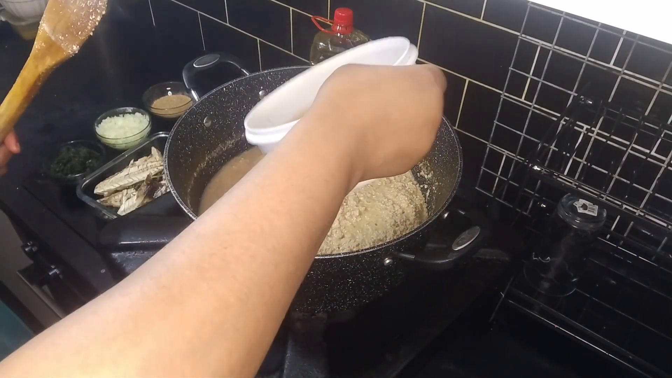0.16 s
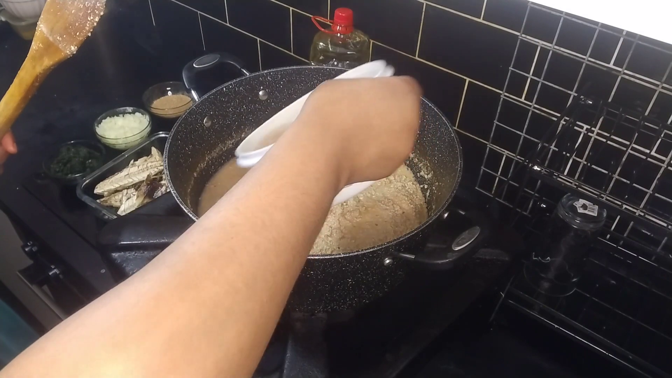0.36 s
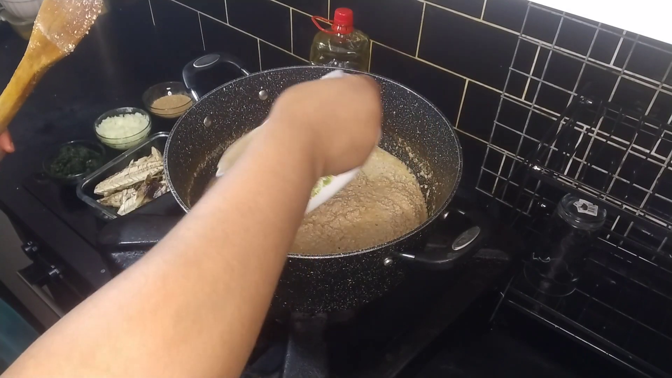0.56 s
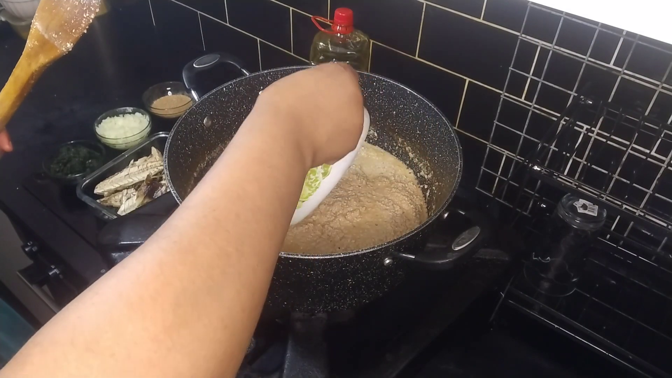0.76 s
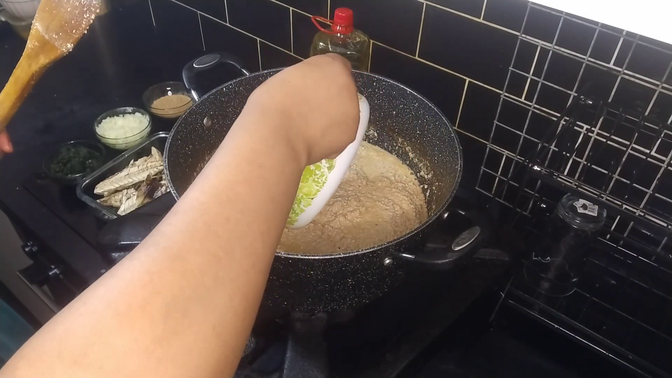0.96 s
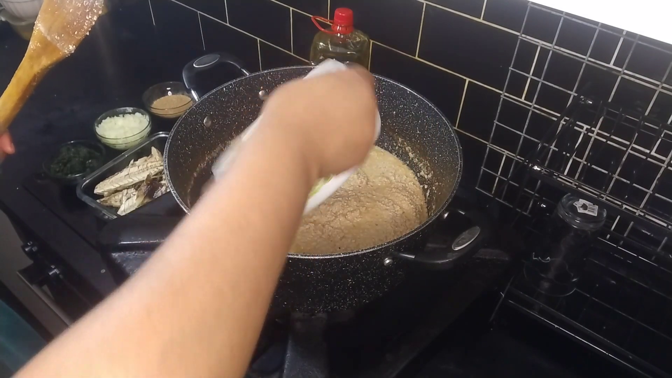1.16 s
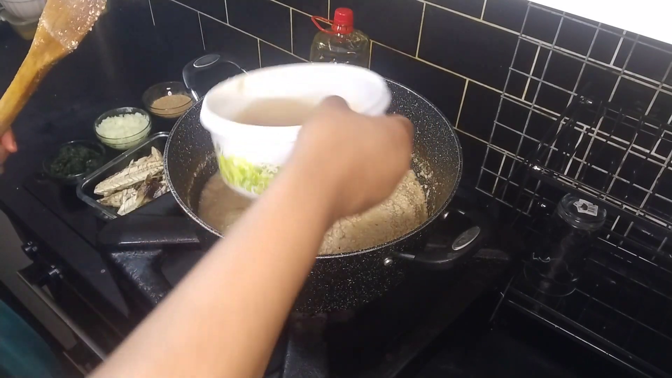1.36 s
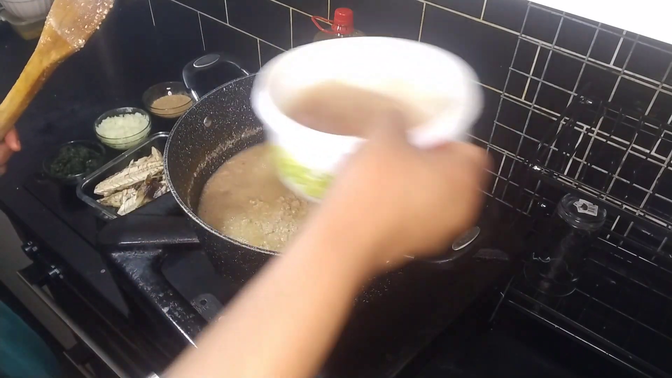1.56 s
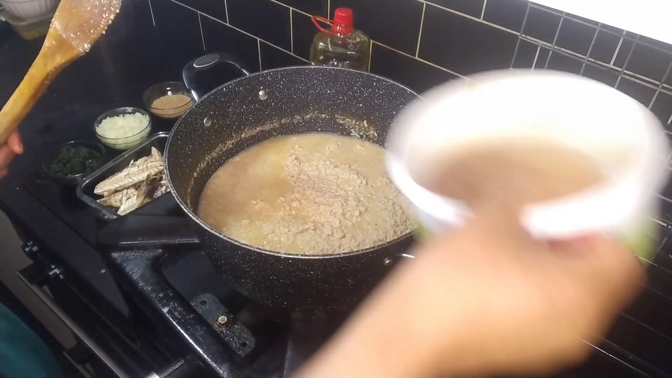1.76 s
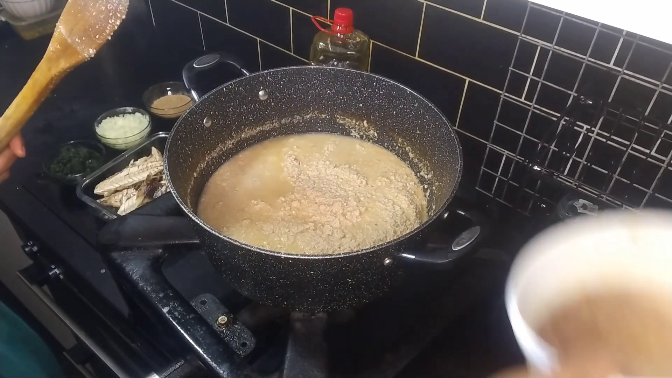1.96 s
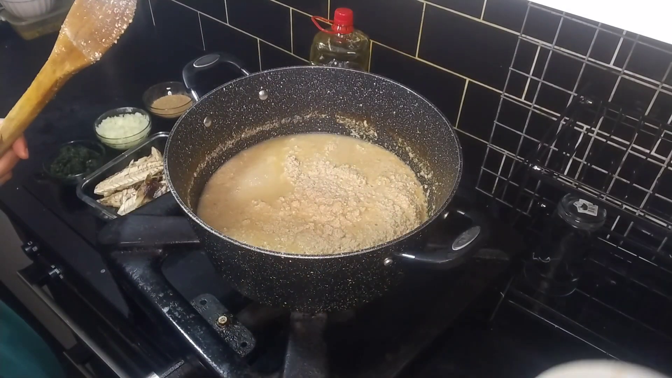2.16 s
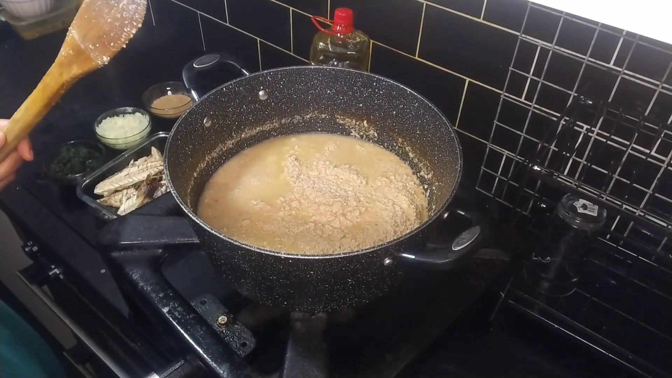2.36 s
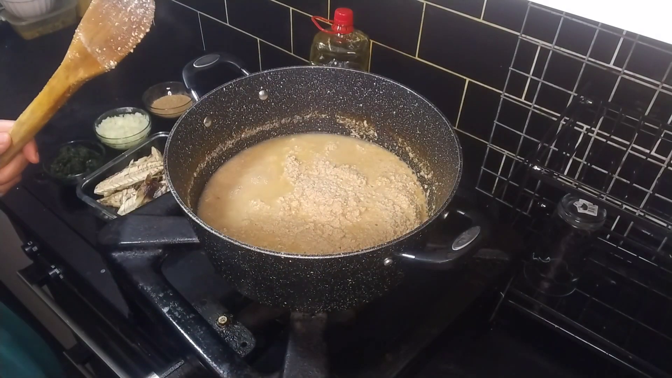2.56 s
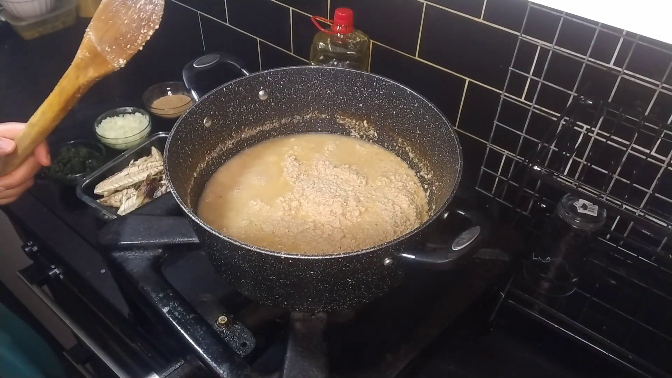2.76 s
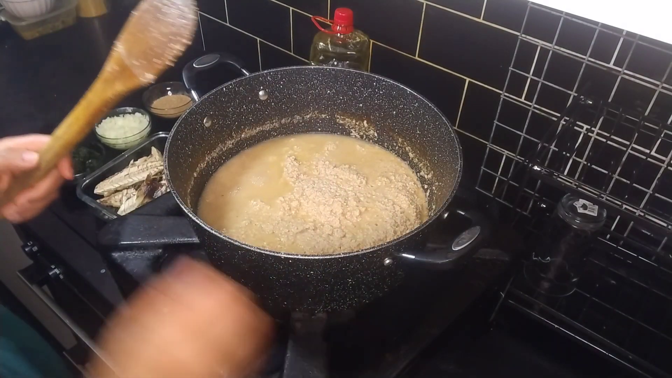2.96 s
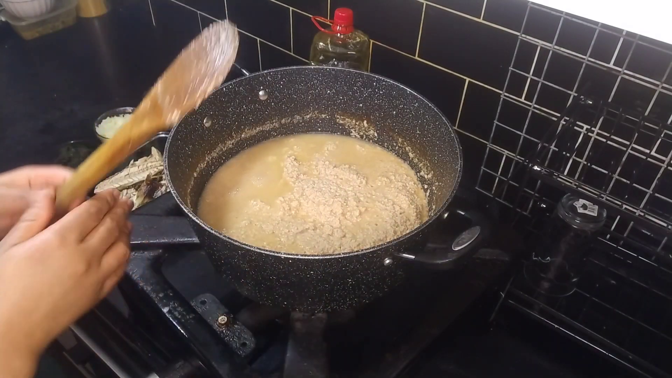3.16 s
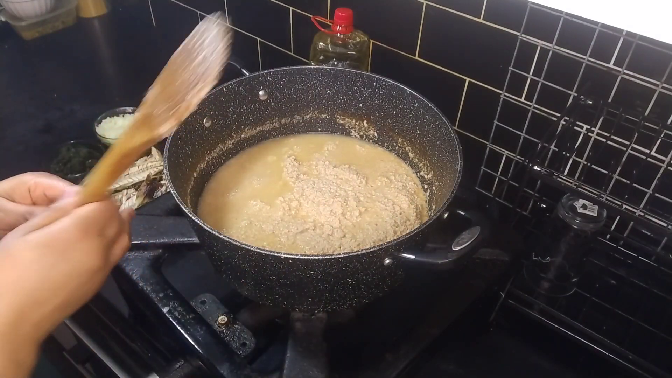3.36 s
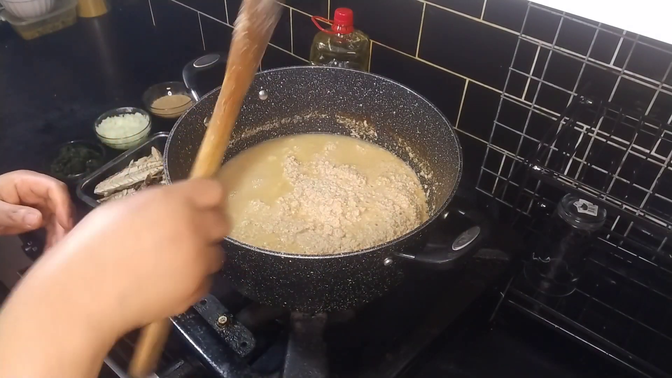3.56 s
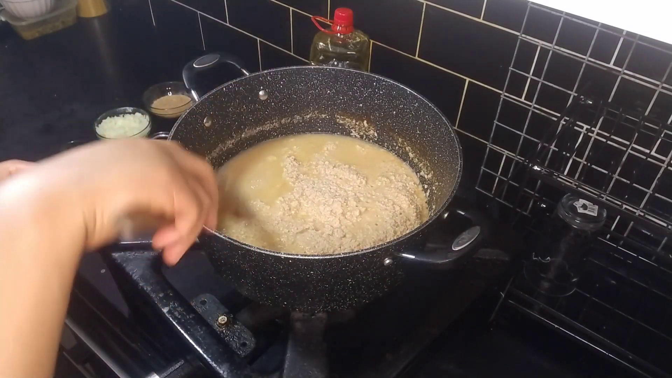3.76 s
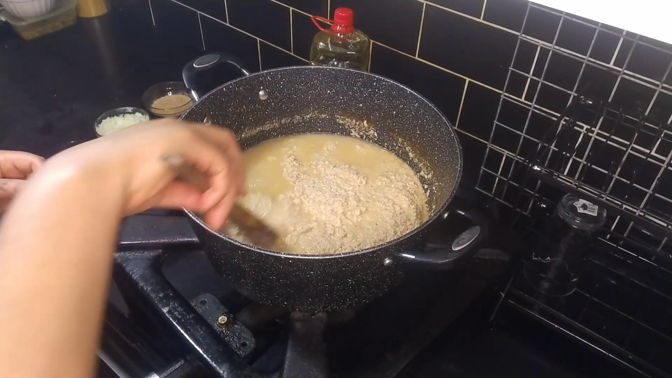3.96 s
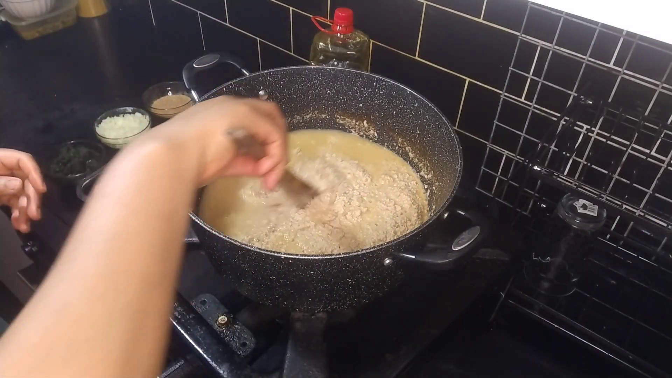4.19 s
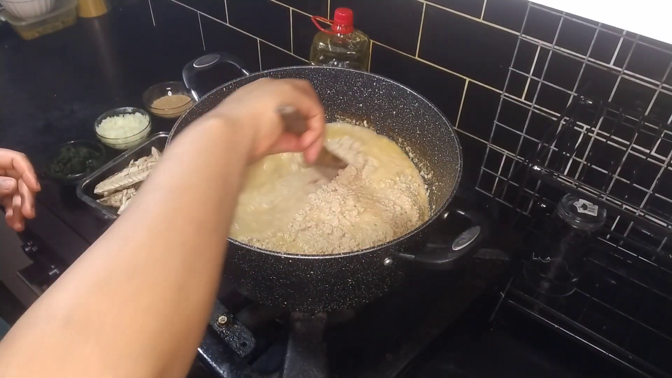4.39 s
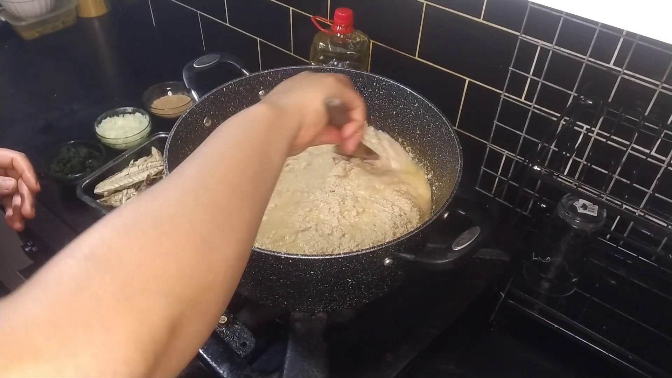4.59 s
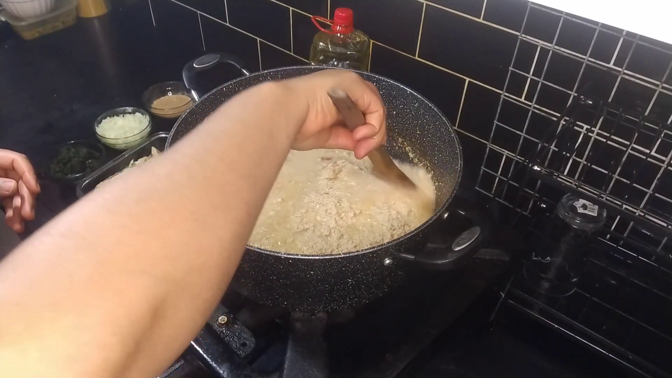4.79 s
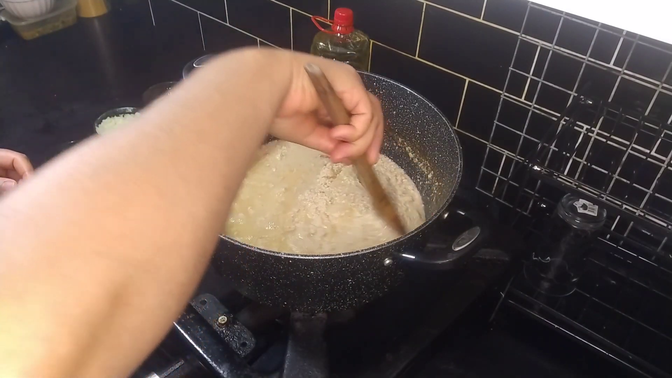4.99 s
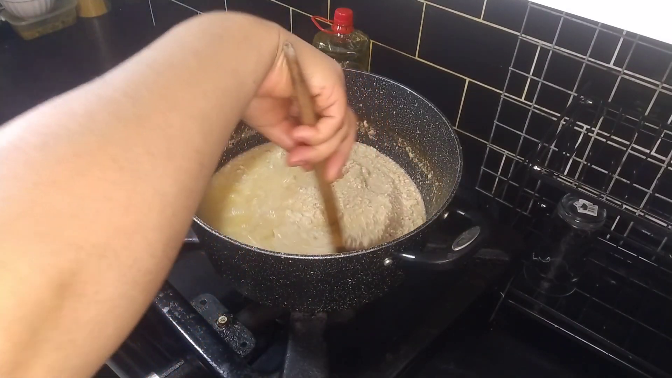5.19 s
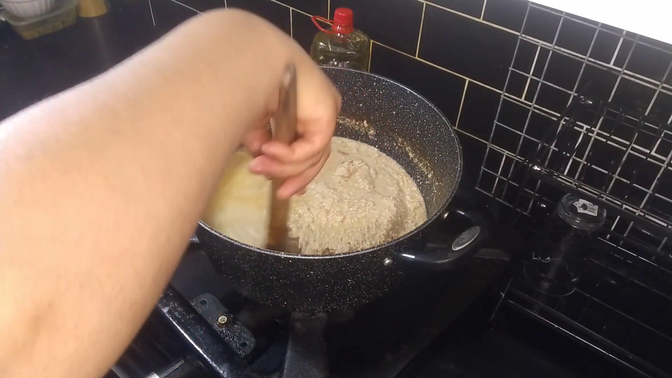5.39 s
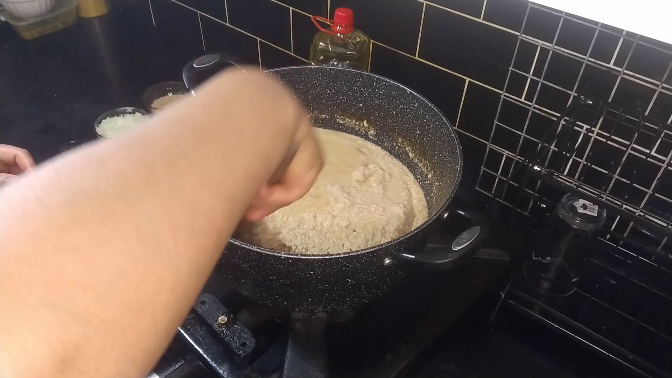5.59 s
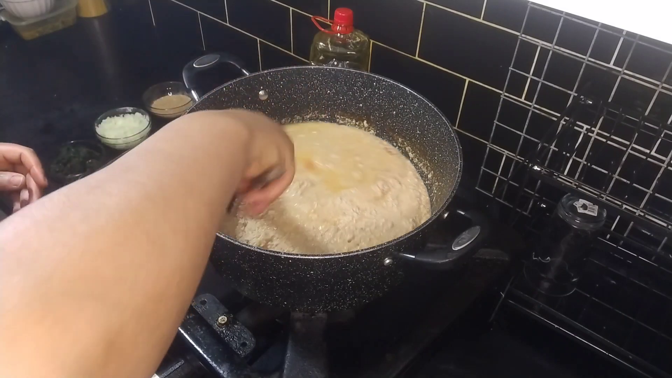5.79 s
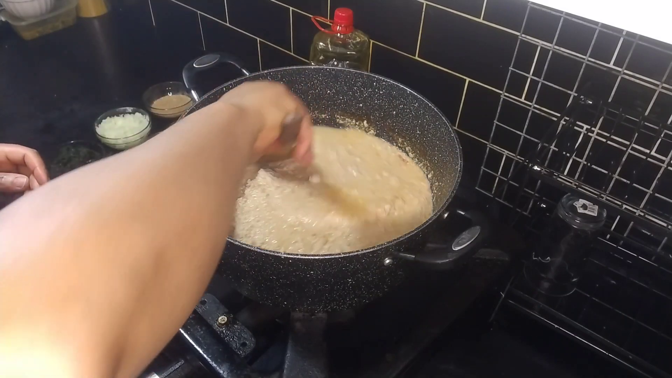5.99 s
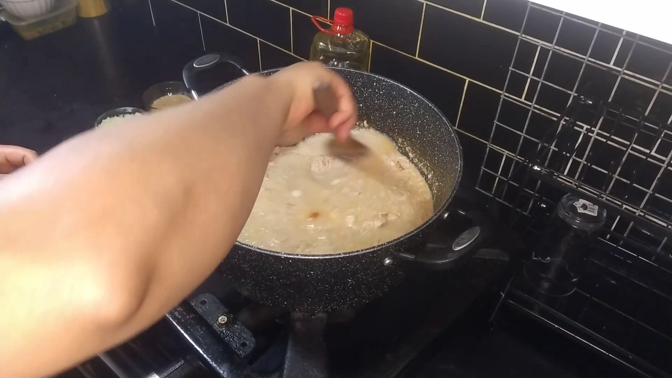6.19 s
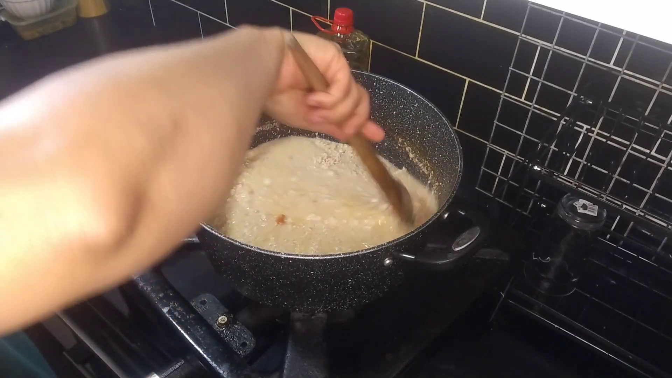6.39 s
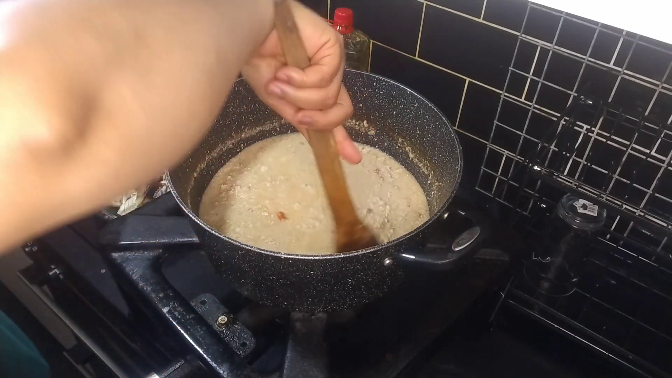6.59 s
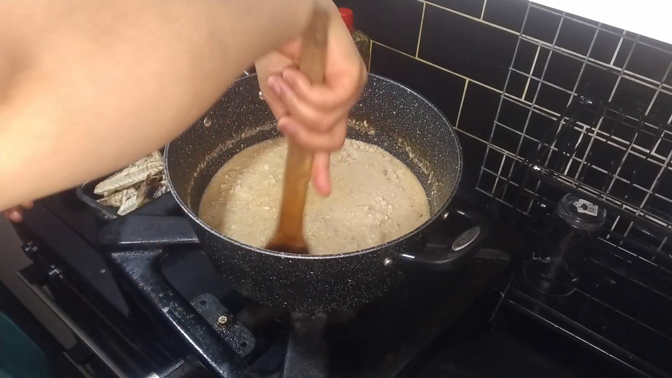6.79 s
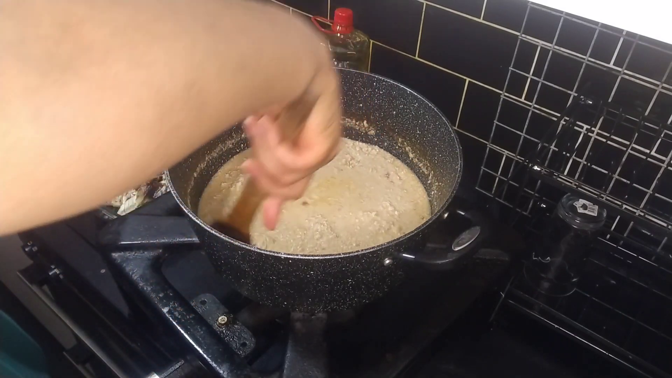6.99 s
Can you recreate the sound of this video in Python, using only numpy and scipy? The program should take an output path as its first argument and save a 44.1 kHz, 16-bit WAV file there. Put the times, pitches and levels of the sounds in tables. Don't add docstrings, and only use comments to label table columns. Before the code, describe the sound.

Bright steady sizzle from a pot of thick soup, liquid glugging in, a plastic tub clattering onto the counter, then wooden-spoon stirring with a steam hiss.

```python
import sys
import numpy as np
from scipy import signal
from scipy.fft import rfft, irfft, next_fast_len
from scipy.io import wavfile

SR = 44100
rng = np.random.default_rng(int(sys.argv[2]) if len(sys.argv) > 2 else 0)


def volts_from_decibels(level):
    exponent = np.asarray(level, float) / 20
    return 10 ** exponent


def transcribe(signal):
    frames = np.atleast_2d(signal).T
    limited = np.clip(frames, -1, 1)
    pcm = np.round(limited * 32767).astype(np.int16)
    wavfile.write(sys.argv[1], SR, pcm)


N = 310391

# pitch_hz, likeness (0 to 1)
PORT_LIKENESS = [(30, .72), (60, .8), (130, .92), (290, .96), (420, .85), (600, .5), (1000, .3),
                 (2000, .12), (4000, .04), (15000, .02)]
# pitch_hz, level_db
PORT_BALANCE = [(25, .4), (80, -1.3), (250, .7), (1000, .3), (2000, -.6), (4000, .7), (9000, .3),
                (13000, -3.5)]
LEFT_LAG = 5
MIC_HISS_DB, MIC_HISS_HZ = -60.5, 3000
PORT_HZ, PORT_WIDTH_HZ, PORT_GAIN = 13100, 660, 1.8
TOP_CUT_HZ = 15740
WALL_TRIPS = [.0083, .0091, .0107, .0119, .0131, .0143, .0157, .0173, .0187, .0199, .0217, .0233, .0251,
              .0269, .0283, .0307]
KITCHEN_T60_S, WALL_CUT_HZ = 0.41, 4200
# pitch_hz, level_db (per Hz)
ROOM_COLOUR = [(14, 12.5), (24, -4.5), (32, -2), (42, -13), (55, -6.5), (75, -12.5), (120, -13), (150, -13),
               (220, -25.5), (294, -20.5), (418, -20.5), (800, -22.5), (1100, -17.5), (1500, -35)]
ROOM_DB = -50
# pitch_hz, level_db
FRIDGE_HUM = [(100.6, -53.5), (50, -62.5), (147.5, -62.5)]

# start_s, crack_db, thud_db
TUB_TOUCHES = [
    (2.5358, -12, -20),
    (2.548, -21, -34),
    (2.556, -27, -52),
    (2.566, -28, -43),
    (2.578, -22, -27),
    (2.586, -26, -40),
    (2.601, -29, -29.5),
    (2.701, -31.5, -36),
    (2.749, -36, -47),
    (2.8, -50, -43),
]
# pitch_hz, level_db, t60_s (shortened to 0.15 of this when it rings)
TUB_SHELL = [(666, -6, 0.4), (800, -5, 0.37), (1265, 2, 0.54), (1480, -13, 0.35), (1620, -1, 0.43),
             (1870, -8, 0.8), (2400, -1, 0.32), (2640, -28, 0.27), (3100, -1, 0.12), (3585, -14, 0.25),
             (4240, -15, 0.19), (5200, -22, 0.2), (2130, -13, 0.18), (1060, -15, 0.22)]
# pitch_hz, level_db, t60_s
COUNTER_MODES = [(42, -7, 0.18), (57.3, -2.5, 0.26), (84.8, 5.5, 0.09), (109, 13.5, 0.053),
                 (140, -17, 0.12), (258.5, -17, 0.14), (423, -10.5, 0.048), (560, -30, 0.07),
                 (684, -13, 0.17)]
SOFT_TOUCH_DULLS = 0.74

# pitch_hz, width_hz, level_db
POT_LOW_MODES = [(418.6, 32, 6.5), (486, 30, 2), (547, 36, 1.5), (630.4, 11.6, -0.5), (711, 17, -5.5)]
# pitch_hz, width_hz, level_db
POT_HIGH_MODES = [(786, 32, -2), (935, 28, 3.5), (1106, 47, 4), (1289, 23, 0), (1381, 17, 2.5),
                  (1482, 24, -1.5), (1600, 15, -1.5), (1659, 15, 3.5), (1832, 29, 4), (2070, 13, -20),
                  (2300, 72, -0.5), (2698, 34, 4), (3057, 58, 1.5)]
# pitch_hz, width_hz, level_db
SOUP_MODES = [(147, 40, -3), (193, 12, -11), (258, 24, 1.5), (306.2, 24, 1.5)]
# start_s, effort_db
STIRRING = [(0, -3.5), (.55, -2.5), (.8, 2), (1.2, 0), (1.6, 0), (2.1, -2), (3.4, -0.5), (4.2, 5),
            (4.9, 2.5), (5.2, -5.5), (5.45, 6.5), (6.05, 1.5), (6.5, 2), (6.8, 2.5), (7.04, 11.5)]
SOUP_DB, RUMBLE_DB, SCRAPE_DB = -60, -57, -51
SOUP_FOLLOWS, RUMBLE_FOLLOWS, SCRAPE_FOLLOWS_HEAT = 0.82, 0.26, 0.73

# start_s, level_db, pitch_hz, t60_s
SPIT_EVENTS = [(.34, -39, 2120, 0.13), (.754, -35, 6500, .05), (1.041, -29, 6400, 0.18),
               (1.156, -37, 3500, 0.065), (1.277, -36, 2720, 0.058), (1.351, -33, 6600, 0.19),
               (1.501, -31, 5500, 0.04), (3.6, -36, 13000, .05), (3.81, -32, 4150, 0.025),
               (3.808, -33, 13000, .05), (6.087, -38, 14800, .04), (6.407, -43, 9000, .037),
               (6.517, -37.5, 3140, 0.084)]
SPIT_WIDTH, SPIT_RING_DB = 0.16, -25
# start_s, level_db, pitch_hz, t60_s
SPLASH_EVENTS = [(.766, -42, 2700, 0.21), (.806, -35, 2900, 0.17), (0.817, -38.5, 1700, .08),
                 (0.749, -36, 5000, .015), (6.225, -47, 1240, 0.1), (6.095, -41, 3000, .02),
                 (.95, -43, 1000, 0.09), (1.037, -45, 900, 0.15), (1.074, -40, 1290, 0.12),
                 (1.171, -39.5, 2800, 0.13), (2.885, -36, 2470, 0.026), (2.896, -31.5, 2450, 0.02),
                 (3.542, -31, 2450, 0.017), (3.602, -29.5, 6000, 0.019), (3.869, -36, 3000, 0.034),
                 (5.289, -42, 3650, 0.11), (5.43, -37, 3940, 0.089), (6.303, -34.5, 4440, 0.065),
                 (6.417, -34, 5260, 0.092), (6.58, -43, 5000, 0.043), (6.601, -47, 795, 0.087),
                 (6.742, -53, 810, 0.04), (6.801, -45.5, 800, 0.15), (6.91, -47.5, 900, .15)]
SPLASH_WIDTH, SPLASH_RING_DB = 0.67, -17
# start_s, level_db
SPOON_TAPS = [
    (4.053, -46),
    (5.632, -37),
    (5.928, -43),
    (6.304, -49),
    (6.414, -37.5),
    (6.505, -59),
]
TAP_HZ, TAP_WIDTH_HZ, TAP_T60_S, TAP_RING_DB = 1500, 860, 0.13, -13.5

# start_s, level_db, pitch_hz, t60_s
BUBBLE_EVENTS = [(.343, -48, 2250, .06), (.769, -30.5, 2980, 0.025), (.778, -36, 2300, 0.04),
                 (.775, -44, 980, .04), (.824, -29.5, 430, 0.065), (.838, -33, 455, .05),
                 (0.878, -36, 510, .045), (1.04, -45, 659, 0.28), (1.04, -40, 974, 0.056),
                 (1.074, -23.5, 542, 0.041), (1.094, -36, 530, 0.037), (1.177, -34.5, 2590, 0.076),
                 (.9, -44, 540, .04), (1.062, -40, 1800, .08), (1.19, -43, 685, 0.086),
                 (1.335, -36, 660, 0.046), (1.347, -40, 770, 0.096), (1.36, -42, 2260, 0.09),
                 (3.265, -25.5, 250, 0.027), (3.588, -28, 284, 0.034), (4.635, -40, 423, .047),
                 (4.71, -38, 415, 0.087), (4.821, -40, 425, 0.12), (4.951, -34, 2686, 0.051)]
# start_s, level_db, pitch_hz
PLOP_EVENTS = [(5.459, -34, 240), (5.508, -30, 169), (5.555, -44, 300), (5.629, -35, 464),
               (6.096, -42, 425), (6.3, -41, 435), (6.555, -47, 428), (6.778, -41, 440), (5.645, -39, 740),
               (5.709, -42, 281), (5.769, -40, 548), (5.832, -34, 430), (6.48, -43, 570), (6.546, -41, 950),
               (6.605, -42, 640), (6.618, -46, 700), (6.639, -43, 410), (6.66, -52, 418), (6.686, -37, 412),
               (6.739, -39, 915), (6.761, -40, 430), (6.92, -43, 775), (7.02, -41, 520), (7.027, -38, 990)]
PLOP_T60_S, BUBBLE_RISE = 0.056, 0.073
# start_s, level_db, pitch_hz, t60_s
WALL_PINGS = [(5.632, -35.5, 1950, 0.11), (5.632, -38, 1306, 0.11), (6.098, -40, 2040, 0.099),
              (6.13, -48, 560, 0.25), (6.304, -45, 1830, 0.1), (6.412, -33.5, 1113, 0.091),
              (6.416, -36.5, 2030, .06), (6.425, -37.5, 429, .1), (6.5065, -29, 1080, 0.034),
              (6.521, -44, 1010, .05), (6.79, -48, 2140, 0.088), (6.51, -47, 1840, 0.1),
              (6.783, -42, 1110, 0.045), (6.897, -42, 1105, 0.05)]
PING_RISE = 0.035
# start_s, level_db, pitch_hz
SOFT_THUMPS = [
    (.41, -54, 42),
    (2.685, -32, 140),
    (2.719, -24.5, 61.4),
    (2.745, -39, 115),
    (2.789, -43, 70.4),
    (3.969, -34.5, 50),
    (4.031, -37, 44.7),
    (4.6, -61, 48),
    (6.82, -37, 179),
]
THUMP_CYCLES = 11.3

# pitch_hz, level_db (per Hz)
HISS_COLOUR = [(3500, -7.5), (5800, -4.5), (6300, 0), (7500, 2.5), (8900, 8), (10200, 9.5), (11500, 5),
               (13200, -1.5), (17000, -8)]
# pitch_hz, level_db (per Hz)
COARSE_COLOUR = [(600, -31), (1000, -12.5), (1460, -9), (2050, -4), (3500, -6), (6500, -4.5), (8500, -4),
                 (11000, -24)]
# pitch_hz, level_db (per Hz)
FLASH_COLOUR = [(3500, -14), (6000, -12.5), (7500, -8), (9000, -2.5), (10500, 0.5), (11500, -4),
                (12700, -10), (15000, -13), (17000, -18)]
# start_s, sizzle_db
FLOOR_HEAT = [(0.0, -39), (1.28, -39.5), (1.63, -41.5), (2.58, -41), (2.91, -42), (3.98, -43.5),
              (4.35, -45), (5.1, -46.5), (6.15, -50.5), (6.36, -53), (7.04, -51)]
FIZZ_DB, FIZZ_FOLLOWS = -50.5, 0.37
FLASH_START_S, FLASH_FULL_S, FLASH_END_S = 5.148, 5.35, 5.73
FLASH_DB, FLASH_SETS_IN_DB, FLASH_FALL_DB_PER_S = -40.5, -4, 38
FLASH_FIZZ_DB, FLASH_SCRAPE_DB, CHURN_DB, CHURN_LATE_S = -9, -4, -54.5, 0.1
# start_s, rise_db
FLASH_SPURTS = [
    (5.3, 4.5),
    (5.44, 1.5),
    (5.63, 0.5),
    (5.68, 2),
    (5.745, 2),
]
SPURT_S, SPURT_FIZZ = 0.019, 2.2


def rms_one(x):
    return x / np.sqrt(np.mean(x ** 2) + 1e-20)


def in_time(rows):
    s, *columns = np.transpose(rows)
    return [np.interp(np.arange(N) / SR, s, c) for c in columns]


def at_hz(points, hz):
    points = np.array(points)
    return np.interp(np.log(hz), np.log(points[:, 0]), points[:, 1])


def shaped(x, gain_db):
    size = next_fast_len(N)
    hz = np.arange(1, size // 2 + 2) * SR / size
    return irfft(rfft(x, size) * volts_from_decibels(gain_db(hz)), size)[:, :N]


def drift(rate):
    r = np.exp(-80 * np.pi * rate / SR)
    noise = rng.standard_normal(N // 40 + 2002)
    slow = signal.lfilter([1], [1, -2 * r, r * r], noise)[2000:]
    return np.interp(np.arange(N) / 40, np.arange(len(slow)), rms_one(slow))


def resonance(x, hz, width_hz):
    r = np.exp(-np.pi * width_hz / SR)
    feedback = [1, -2 * r * np.cos(2 * np.pi * hz / SR), r * r]
    return signal.lfilter(np.array([1, 0, -1]) * (1 - r * r) / 2, feedback, x)


def add(out, s, sound):
    i = round(s * SR)
    out[:, i:i + sound.shape[1]] += sound[:, :N - i]


def near(x):
    return np.array([np.roll(x, LEFT_LAG), x])


def spread(shared, own, hz):
    alike = np.clip(at_hz(PORT_LIKENESS, hz), 0, 1)
    tilt = volts_from_decibels(at_hz(PORT_BALANCE, hz) / 2 * np.array([[1], [-1]]))
    return tilt * (np.sqrt(alike) * near(shared) + np.sqrt(1 - alike) * own)


def tone(hz, t):
    apart = np.pi / 4 * np.clip(np.max(hz) / 1000, 0, 1)
    return np.sin(2 * np.pi * hz * t + apart * np.array([[-1], [1]]))


def puffs(count, size):
    noise = rng.standard_normal((count, 3, size))
    shared, own = noise[:, :1], noise[:, 1:]
    left = 0.36 * np.roll(shared, LEFT_LAG, axis=2) * [[1], [0]]
    return 0.59 * own + left + 0.6 * shared * [[0], [1]]


def grains(per_s, uneven_db):
    sizes = volts_from_decibels(uneven_db * np.minimum(rng.exponential(1, N), 4)) * rng.standard_normal(N)
    stream = sizes * (rng.random(N) < per_s / SR)
    return np.array([np.roll(stream, k * N // 6) for k in range(6)]).reshape(2, 3, N)


def banded(drive, spectrum, patchy_db):
    out, together = 0, drift(21.4)
    low_hz, top_hz = spectrum[0][0], min(spectrum[-1][0], 17000)
    edges = low_hz * 2 ** np.arange(0, np.log2(top_hz / low_hz) + 1 / 3, 1 / 3)
    for k, (low, high) in enumerate(zip(edges, edges[1:])):
        band = signal.butter(2, [low, high], "band", fs=SR, output="sos")
        part = signal.sosfilt(band, drive[k % 2])
        flicker = volts_from_decibels(patchy_db * (1.4 * together + drift(13)))
        out = out + flicker * spread(part[0], part[1:], np.sqrt(low * high))
    return rms_one(shaped(out, lambda hz: at_hz(spectrum, hz)))


def mic_hiss():
    high_pass = signal.butter(1, MIC_HISS_HZ, "high", fs=SR, output="sos")
    hiss = signal.sosfilt(high_pass, rng.standard_normal((2, N)))
    return volts_from_decibels(MIC_HISS_DB) * (hiss + PORT_GAIN * resonance(hiss, PORT_HZ, PORT_WIDTH_HZ))


def room_tone():
    t, hum = np.arange(N) / SR, 0
    for hz, db in FRIDGE_HUM:
        level = volts_from_decibels(db + 1.0 + 0.77 * drift(1.4))
        hum = hum + level * np.sin(2 * np.pi * hz * t + 0.11 * drift(6.9) + [[-.17], [.17]])
    air = banded(grains(SR, uneven_db=0.0), ROOM_COLOUR, patchy_db=1.37)
    return volts_from_decibels(ROOM_DB) * air + hum * volts_from_decibels([[-.7], [.7]])


def kitchen(x):
    size = next_fast_len(N + SR)
    w = 2 * np.pi * np.arange(size // 2 + 1) / size
    hz = w * SR / (2 * np.pi)
    t60 = KITCHEN_T60_S / (1 + hz / WALL_CUT_HZ)
    walls = np.zeros((2, len(w)), complex)
    for k, lag in enumerate(WALL_TRIPS):
        echo = volts_from_decibels(-60 * lag / t60) * np.exp(-1j * w * round(lag * SR))
        walls[k % 2] += echo / (1 - echo) * (-1) ** (k // 2)
    return irfft(walls * rfft(x, size) * hz / (hz + 300), size)[:, :N]


def tub():
    out, t = np.zeros((2, N)), np.arange(SR // 2) / SR
    strength = rng.normal(0, 2.5, (len(TUB_TOUCHES), len(TUB_SHELL)))
    for (s, crack_db, thud_db), puff, luck in zip(TUB_TOUCHES, puffs(len(TUB_TOUCHES), len(t)), strength):
        dulled_db = SOFT_TOUCH_DULLS * (crack_db - TUB_TOUCHES[0][1])
        bright = resonance(resonance(puff, 7800, 11000), 7800, 11000)
        crack = volts_from_decibels(-14.5 + dulled_db - 60 * t / 0.13) * rms_one(bright)
        slap = volts_from_decibels(-12 - 60 * t / 0.09) * rms_one(resonance(puff, 800, 2530))
        rattle = volts_from_decibels(-16 - 60 * t / 0.052) * rms_one(resonance(puff, 3500, 2700))
        snap = volts_from_decibels(1.5 - 60 * t / 0.006) * tone(1250, t + 0.00041)
        shell = sum(volts_from_decibels(db + g - 16.0 - 60 * t / (0.15 * t60)) * tone(hz, t)
                    for (hz, db, t60), g in zip(TUB_SHELL, luck))
        thud = 0
        for hz, db, t60 in COUNTER_MODES:
            swell = 1 - np.exp(-t * hz / 1.23)
            thud = thud + volts_from_decibels(db - 60 * t / t60) * swell * tone(hz, t + 0.0011)
        plastic = volts_from_decibels(crack_db) * (crack + slap + rattle + snap + shell)
        add(out, s, plastic - volts_from_decibels(thud_db + np.array([[-.8], [.8]])) * thud)
    return out


def flash_db(late_s):
    t = np.arange(N) / SR
    builds = np.interp(t - late_s, [FLASH_START_S - .012, FLASH_START_S, FLASH_FULL_S], [-40, FLASH_SETS_IN_DB, 0])
    spurts = sum(db * np.exp(-((t - s) / SPURT_S) ** 2) for s, db in FLASH_SPURTS)
    return builds - FLASH_FALL_DB_PER_S * np.maximum(t - FLASH_END_S, 0), spurts


def pot(drive, modes):
    out = 0
    for k, (hz, width_hz, db) in enumerate(modes):
        part = resonance(drive[k % 2], hz, width_hz) / np.sqrt(width_hz / 30)
        out = out + volts_from_decibels(db) * spread(part[0], part[1:], hz)
    return out


def drag():
    (effort_db,), (heat_db,) = in_time(STIRRING), in_time(FLOOR_HEAT)
    slips = grains(1200, uneven_db=0.5) * volts_from_decibels(1.4 * drift(4.8))
    high = pot(grains(2500, uneven_db=2.5) * volts_from_decibels(1.2 * drift(8.7)), POT_HIGH_MODES)
    soup_level = volts_from_decibels(SOUP_DB + SOUP_FOLLOWS * effort_db - 1.0)
    rumble_level = volts_from_decibels(RUMBLE_DB + RUMBLE_FOLLOWS * effort_db + 1.0)
    heat_scrape = volts_from_decibels(SCRAPE_DB + SCRAPE_FOLLOWS_HEAT * (heat_db - heat_db.mean()))
    flash_scrape = volts_from_decibels(FLASH_DB + FLASH_SCRAPE_DB + flash_db(CHURN_LATE_S)[0])
    scrape = np.hypot(heat_scrape, flash_scrape)
    soup = soup_level * rms_one(pot(slips, SOUP_MODES))
    rumble = rumble_level * rms_one(pot(slips[::-1], POT_LOW_MODES))
    return soup + rumble + volts_from_decibels(-6.5) * scrape * rms_one(high)


def contacts():
    out, shake, t = np.zeros((2, N)), np.zeros((2, N)), np.arange(SR // 4) / SR
    touches = ([(s, db, hz, SPIT_WIDTH * hz, t60, SPIT_RING_DB) for s, db, hz, t60 in SPIT_EVENTS]
               + [(s, db, hz, SPLASH_WIDTH * hz, t60, SPLASH_RING_DB) for s, db, hz, t60 in SPLASH_EVENTS]
               + [(s, db, TAP_HZ, TAP_WIDTH_HZ, TAP_T60_S, TAP_RING_DB) for s, db in SPOON_TAPS])
    for (s, db, hz, width_hz, t60, ring_db), puff in zip(touches, puffs(len(touches), len(t))):
        shape = volts_from_decibels(db - 2.5 - 60 * t / t60) * (1 - np.exp(-t / 0.00097))
        coloured = resonance(resonance(puff, hz, 1.2 * width_hz), hz, 1.2 * width_hz)
        add(out, s, shape * rms_one(coloured))
        add(shake, s, shape * puff * volts_from_decibels(ring_db + 26.0))
    shake = shake + 1e-18
    high = sum(volts_from_decibels(db) * resonance(shake, hz, width_hz) for hz, width_hz, db in POT_HIGH_MODES)
    low = sum(volts_from_decibels(db) * resonance(shake[0], hz, width_hz) for hz, width_hz, db in POT_LOW_MODES)
    return out + high + near(low)


def bubbles():
    out, t = np.zeros((2, N)), np.arange(SR // 4) / SR
    rings = ([(*row, BUBBLE_RISE) for row in BUBBLE_EVENTS]
             + [(*row, PLOP_T60_S, BUBBLE_RISE) for row in PLOP_EVENTS]
             + [(*row, PING_RISE) for row in WALL_PINGS]
             + [(*row, THUMP_CYCLES / row[2], 0) for row in SOFT_THUMPS])
    for (s, db, hz, t60, rise), puff in zip(rings, puffs(len(rings), len(t))):
        swell = 1 - np.exp(-t * hz / 1.52)
        rough = 0.28 * rms_one(resonance(puff.mean(axis=0), hz, 0.33 * hz))
        ring = tone(hz * (1 + rise * t / t60 / 2), t)
        add(out, s, volts_from_decibels(db - 60 * t / t60) * swell * (ring + rough))
    return out


def sizzle():
    sizzle_db, = in_time(FLOOR_HEAT)
    hiss_db, spurt_db = flash_db(late_s=0)
    late_db, _ = flash_db(CHURN_LATE_S)
    bright = banded(grains(20000, uneven_db=1.5), HISS_COLOUR, patchy_db=.42)
    coarse = banded(grains(8000, uneven_db=1.0), COARSE_COLOUR, patchy_db=0.75)
    flash = banded(grains(20000, uneven_db=3.5), FLASH_COLOUR, patchy_db=.7)
    churn = near(rms_one(resonance(grains(900, uneven_db=2.0)[0, 0], 210, 210)))
    simmer_db = FIZZ_DB + FIZZ_FOLLOWS * (sizzle_db - sizzle_db.mean())
    flash_fizz_db = FLASH_DB + FLASH_FIZZ_DB + hiss_db + SPURT_FIZZ * spurt_db
    fizz = np.hypot(volts_from_decibels(simmer_db + 2.0), volts_from_decibels(flash_fizz_db + 0.5))
    steam = volts_from_decibels(FLASH_DB + hiss_db + spurt_db + 4.0) * flash + volts_from_decibels(CHURN_DB + late_db) * churn
    return volts_from_decibels(sizzle_db + 1.8 + 0.63 * drift(4.4)) * bright + fizz * coarse + steam


def scene():
    events = bubbles() + contacts() + tub()
    echoes = volts_from_decibels(-14.5) * kitchen(events.mean(axis=0))
    return events + echoes + sizzle() + drag() + room_tone() + mic_hiss()


def roll_off(x):
    return signal.sosfilt(signal.butter(12, 15830, fs=SR, output="sos"), x)


def record(dry):
    cut = shaped(dry, lambda hz: -70 * np.clip((hz - TOP_CUT_HZ) / 150, 0, 1) ** .6)
    return roll_off(cut)


dry = scene()
out = record(dry)
transcribe(out)
```